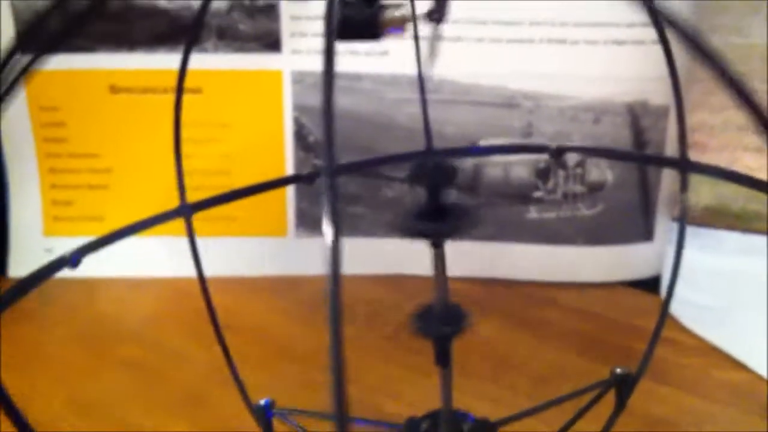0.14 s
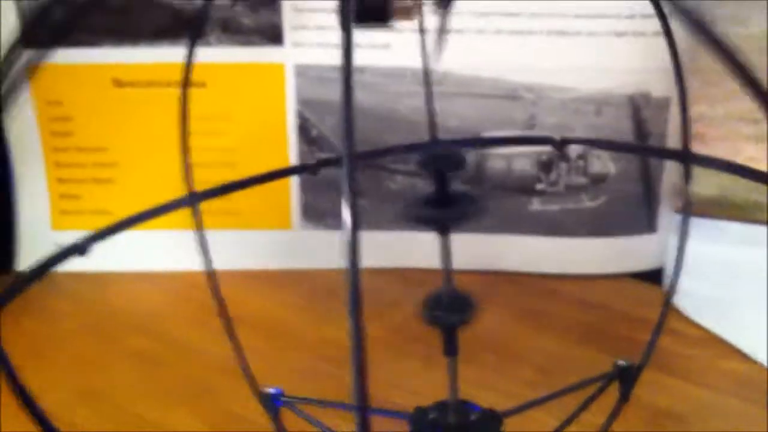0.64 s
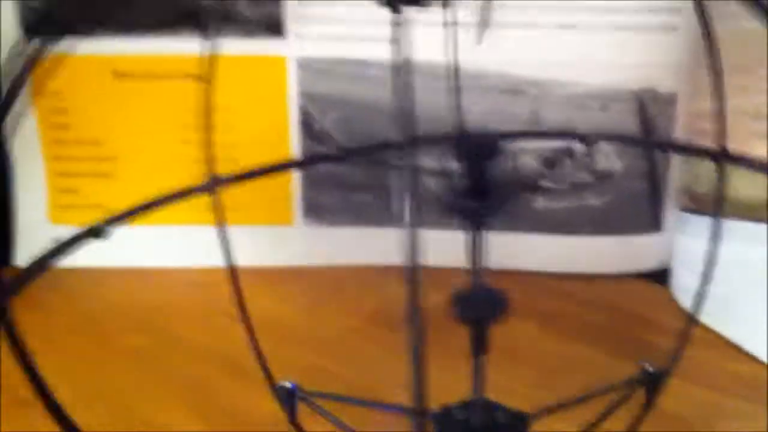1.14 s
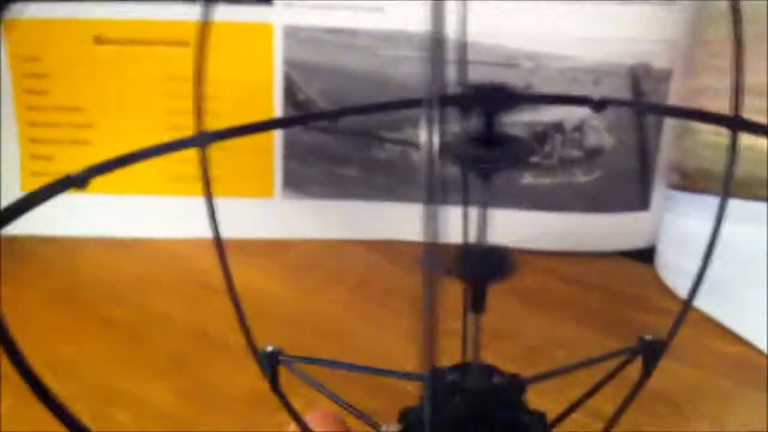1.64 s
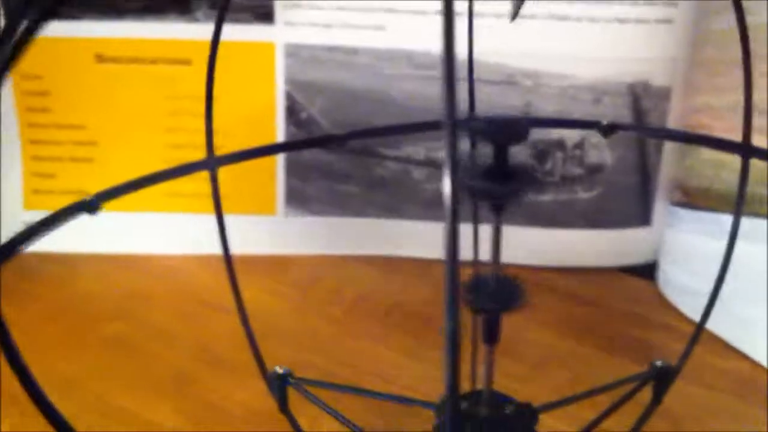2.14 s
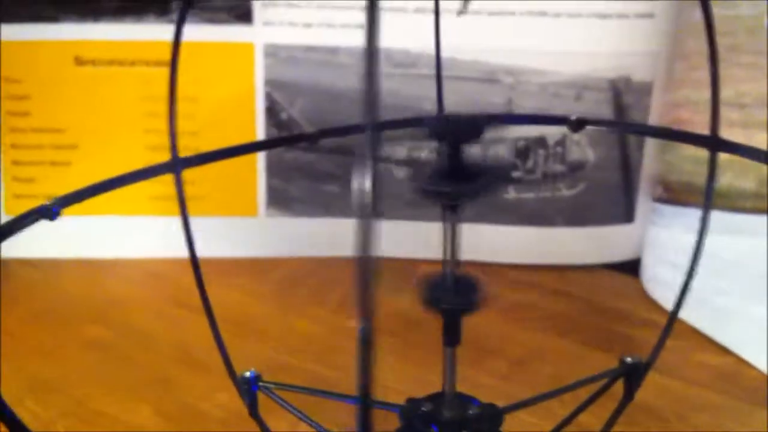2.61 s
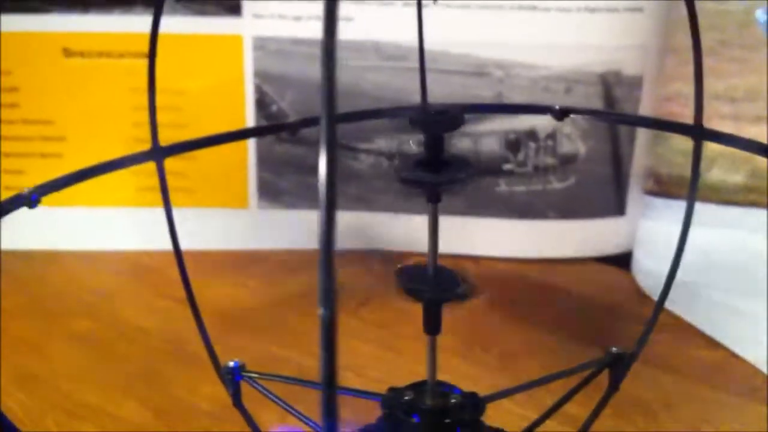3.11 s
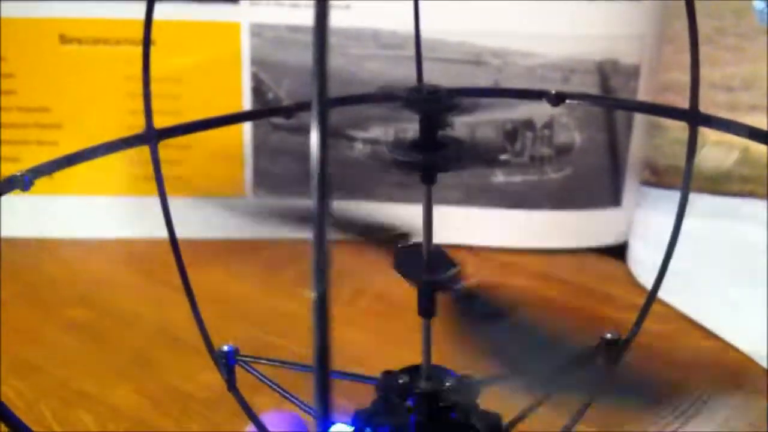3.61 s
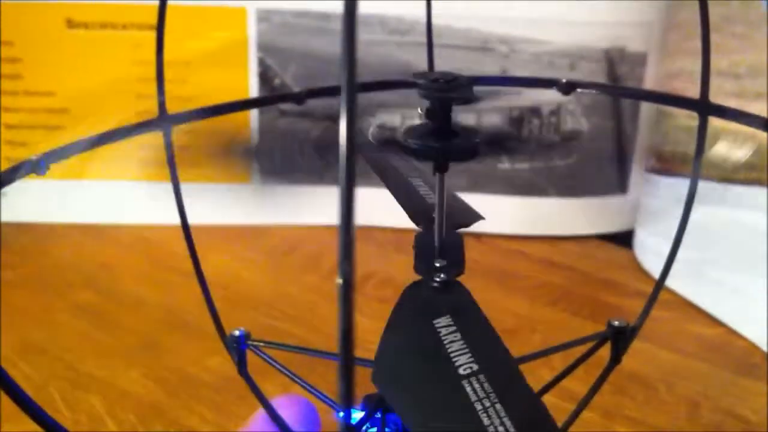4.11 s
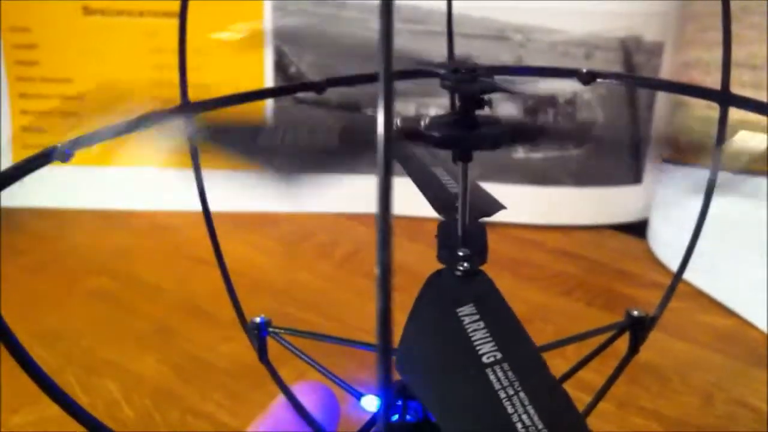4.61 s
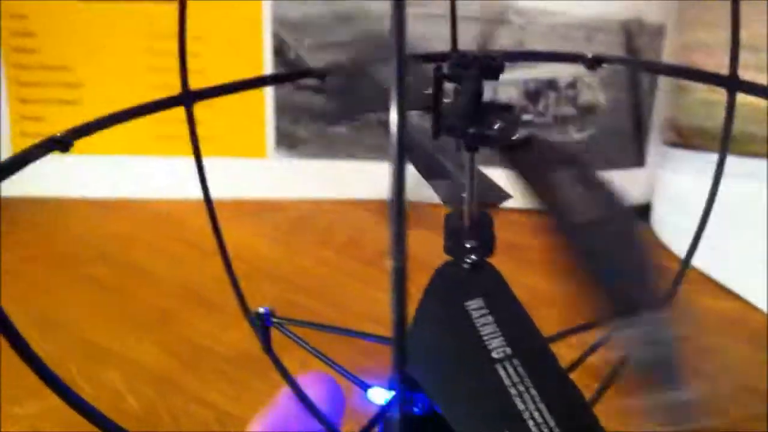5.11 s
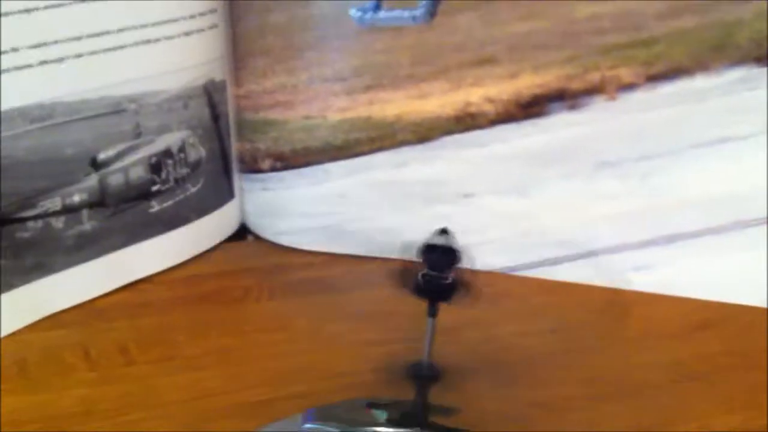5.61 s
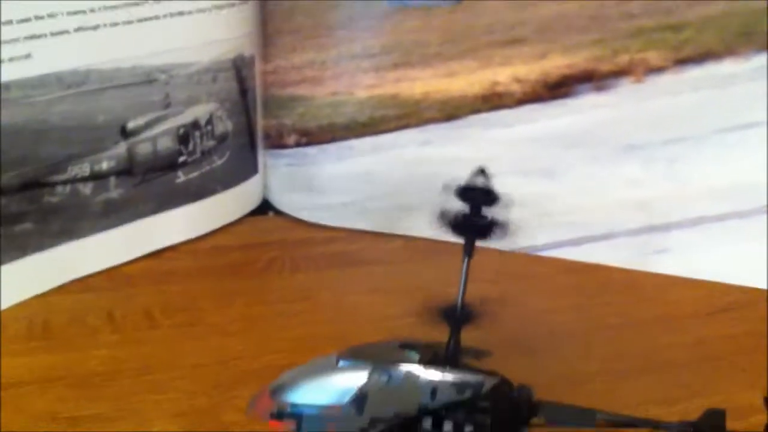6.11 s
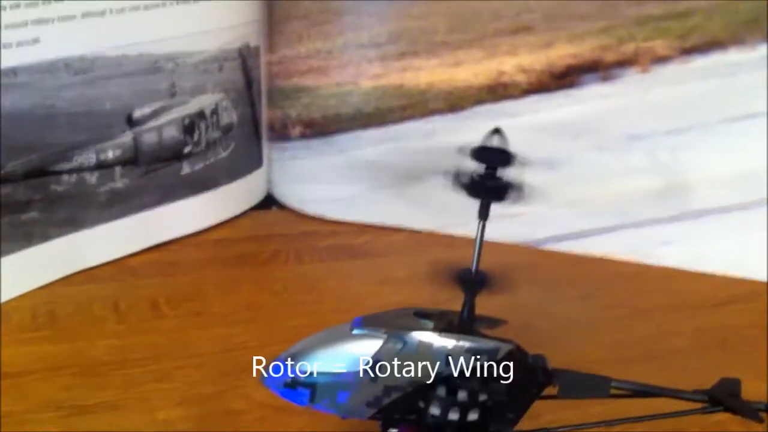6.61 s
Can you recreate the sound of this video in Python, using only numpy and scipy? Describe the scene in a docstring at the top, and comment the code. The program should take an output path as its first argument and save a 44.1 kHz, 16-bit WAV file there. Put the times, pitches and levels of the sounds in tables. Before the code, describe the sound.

A small toy helicopter whines harshly, drops in pitch, cuts off and coasts down with rattling gears; after clicks and a tiny gap, another whines up.

```python
"""A caged toy helicopter runs two geared motors on a table, is throttled back, switched off and coasts down
with rattling gears; a finger clicks and rubs. After a short silent gap a second, bare toy spins up.
Whines are sines at multiples of shaft speed; chopped motor current puts sidebands on every gear tone.
Gear and brush noise, knocks, air, boom and rub are noise shaped by resonant colours; blades are beating sines."""
import sys
import numpy as np
from scipy import signal
from scipy.fft import rfft, irfft
from scipy.io import wavfile
from scipy.ndimage import uniform_filter1d, map_coordinates

SR = 44100
rng = np.random.default_rng(int(sys.argv[2]) if len(sys.argv) > 2 else 0)


def ratio_of_db(decibels):
    """Turn decibels (scalar or array-like) into linear amplitude factors; 0 dB maps to 1."""
    return 10 ** (np.asarray(decibels, float) / 20)


def materialize(psi):
    """Save the field psi as 16-bit PCM at rate SR to the path in sys.argv[1].

    A 1-D psi becomes a single channel; in a 2-D psi each row is a channel.
    """
    bounded = np.clip(np.atleast_2d(psi).T, -1, 1)
    quanta = np.round(bounded * 32767).astype(np.int16)
    wavfile.write(sys.argv[1], SR, quanta)


N = 297675
T = np.arange(N) / SR
GAP_S = (5.232, 5.258)
OFF_S, OFF_FADE_S = 2.47, 0.036  # caged toy switched off
ON_S = 5.628  # bare toy switched on


def response_db(hz, colour, modes):
    """Smooth colour, linear in dB over log frequency, with resonant bumps."""
    f, db = np.transpose(colour)
    smooth = np.interp(np.log(np.maximum(hz, 1)), np.log(f), db)
    return smooth + sum(top / (1 + (2 * (hz - centre) / width) ** 2) for centre, width, top in modes)


def ring(x, colour, modes=()):
    """Causal filtering by the minimum-phase response of that colour; rms 1."""
    log_gain = response_db(np.fft.rfftfreq(8192, 1 / SR), colour, modes) * np.log(10) / 20
    cepstrum = irfft(log_gain)
    cepstrum[1:4096] *= 2
    cepstrum[4097:] = 0
    impulse = irfft(np.exp(rfft(cepstrum)))
    y = signal.fftconvolve(x, impulse)[:N]
    return y / np.sqrt(np.mean(y ** 2))


def highpass(x, hz, order):
    """Butterworth bass cut."""
    return signal.sosfilt(signal.butter(order, hz, "high", fs=SR, output="sos"), x)


def walk(rate_hz, n=N):
    """Random levels held 1 / rate_hz s and smoothed twice; spread near 1."""
    k = int(SR / rate_hz)
    held = np.repeat(rng.standard_normal(n // k + 1), k)
    return 1.3 * uniform_filter1d(uniform_filter1d(held, k), k)[:n]


def turns(hz):
    """Running phase in radians."""
    return 2 * np.pi * np.cumsum(hz) / SR


def step(at_s, over_s):
    """Smooth step from 0 to 1."""
    return .5 + .5 * np.tanh((T - at_s) / (2 * over_s))


def halvings(share):
    """log2 of a speed ratio: -1 per halving."""
    return np.log2(np.clip(share, .01, None))


# quiet hiss colour: (frequency [Hz], relative level [dB])
ROOM_COLOUR = [(18, -34.5), (30, -14), (49, -26), (221, -9.5), (473, -16.5), (540, -14), (616, -19.5),
               (822, -15), (1130, -11), (2350, -14), (16000, -21.5)]
ROOM_DB = -66
HUM_HZ, HUM_BEFORE_GAP_DB, HUM_AFTER_GAP_DB = 604, -77.5, -70


def room():
    """Quiet coloured hiss and a faint hum wavering in pitch and level."""
    hum_db = np.where(T < GAP_S[1], HUM_BEFORE_GAP_DB, HUM_AFTER_GAP_DB) + 2.8 * walk(25)
    hum = ratio_of_db(hum_db) * np.sin(turns(HUM_HZ + 7 * walk(25)))
    hiss_noise = ring(rng.standard_normal(N), ROOM_COLOUR)
    return ratio_of_db(ROOM_DB) * highpass(hiss_noise, 90., order=2) + hum


# low air noise colour: (frequency [Hz], relative level [dB])
RUMBLE_COLOUR = [(18, -40.5), (30, -16), (96, -14.5), (140, 2), (194, -4.5), (298, 5.5), (354, -4),
                 (778, -2.5), (1150, -9), (1800, -7), (2340, -48), (3960, -120)]
WASH_DB, WASH_FALL_DB_S, STILL_DB, BARE_WASH_DB = -45, -48, -69, -62  # downwash


def air():
    """Unsteady downwash noise that dies away around the switch-off and returns with the bare toy."""
    fall_s = np.maximum(T - OFF_S + 0.078, 0)
    level = ratio_of_db(WASH_DB + WASH_FALL_DB_S * fall_s) + ratio_of_db(STILL_DB)
    level = level + (T > ON_S) * ratio_of_db(BARE_WASH_DB)
    return ratio_of_db(0.69 * walk(25.1)) * level * ring(rng.standard_normal(N), RUMBLE_COLOUR)


# table top modes: (frequency [Hz], width [Hz], height [dB])
TABLE_MODES = [(200, 21, 8.8), (318, 50, 10.5)]
# booms: (from [s], to [s], level [dB])
BOOMS = [(2.5, 3.05, -64), (3.65, 4.43, -67.5), (5.028, 5.247, -70.5), (5.412, 6.75, -66),
         (5.85, 6.256, -60.5)]
BOOM_FLOOR_DB, BOOM_EDGE_S = -76.5, 0.046


def table_boom():
    """Low noise in the table's modes; each boom adds a smooth-edged stretch."""
    colour = [(60, -47), (160, -3.5), (250, -0.5), (400, -2.5), (800, -54)]
    table = ring(rng.standard_normal(N), colour, TABLE_MODES)
    level = ratio_of_db(BOOM_FLOOR_DB)
    for from_s, to_s, db in BOOMS:
        level = level + ratio_of_db(db) * (step(from_s, BOOM_EDGE_S) - step(to_s, BOOM_EDGE_S))
    return level * ratio_of_db(0.5 * walk(35)) * table


# clicks: (time [s], peak level [dB])
CLICKS = [(4.9621, -46), (4.9684, -24)]
# click ringing before bass cut and rounding: (frequency [Hz], relative level [dB], t60 [s])
CLICK_MODES = [(440, 10, 0.0066), (1220, 15.5, 0.0019), (2790, -22, 0.0013)]
RUB_S, RUB_RISE_S, RUB_DB = 5.04, 0.027, -62.5
SCUFF_S, SCUFF_LENGTH_S, SCUFF_DB = 5.4, .02, -67


def finger():
    """Two dull clicks of decaying sines; skin dragging on plastic and a faint scuff, both band noise."""
    t, out = T[:SR // 20], np.zeros(N)
    click = sum(ratio_of_db(db - 60 * t / t60) * np.sin(2 * np.pi * hz * t) for hz, db, t60 in CLICK_MODES)
    click = uniform_filter1d(highpass(click, 360.0, order=2), size=7)  # soft skin rounds the edge
    for s, db in CLICKS:
        start = int(s * SR)
        out[start:start + len(t)] += ratio_of_db(db) * click / np.max(click)
    scuff = ring(rng.standard_normal(N), [(300, -20), (800, 0), (2500, -3), (4000, -25)])
    scuff = ratio_of_db(SCUFF_DB) * np.exp(-((T - SCUFF_S) / SCUFF_LENGTH_S) ** 2) * scuff
    rub = ring(rng.standard_normal(N), [(700, -36), (1200, -6), (1450, 5), (1700, -10), (2500, -21)])
    rub = step(RUB_S, RUB_RISE_S) * (T < GAP_S[1]) * ratio_of_db(RUB_DB + 1.0 * walk(60)) * rub
    return out + rub + scuff


UPPER_LOAD_DB = 11


def whine(speed, tones, chop_hz, colour, modes, cruise_hz, wobble_hz, flutter_db):
    """Gear tones with chopper sidebands; each swells as it glides through the frame's modes."""
    on = speed[1] > -100
    hz, bite_db, load = (column[on] for column in speed)
    n = len(hz)
    hz = hz + wobble_hz * walk(40.02, n)
    shaft, chop, out = turns(hz), 2 * np.pi * chop_hz * T[on], np.zeros(N)
    for order, *levels in tones:
        load_db = UPPER_LOAD_DB * load * (order == 8)  # an exact eighth multiple swells under load
        for side, db in zip((0, -1, 1), levels):
            mode_db = response_db(order * hz[::64] + side * chop_hz, colour, modes)
            mode_db = mode_db - response_db(order * cruise_hz + side * chop_hz, colour, modes)
            mode_db = np.repeat(mode_db, 64)[:n]
            # sidebands flutter more than the tones they flank
            flutter = flutter_db * (1.8 if side else 1) * walk(34.96, n)
            gain = ratio_of_db(db + bite_db + load_db + mode_db + flutter)
            phase = order * shaft + side * chop + 2 * np.pi * rng.random()
            out[on] += np.sqrt(2) * gain * np.sin(phase)
    return out


def clatter(shaft, memory_turns):
    """Noise repeating every shaft turn, its pattern renewed over memory_turns."""
    turn = shaft / (2 * np.pi)
    pattern = rng.standard_normal((int(turn[-1] / memory_turns) + 2, 129))
    pattern[:, -1] = pattern[:, 0]
    return 1.5 * map_coordinates(pattern, [turn / memory_turns, turn % 1 * 128], order=1)


def hiss(speeds, depths, chop_hz, chop_depth, colour, modes, grit_db, clatter_db, memory_turns):
    """Tooth and brush noise, partly repeating with the shafts, puffing per turn and per chopper cycle."""
    gate = np.exp(chop_depth * np.cos(2 * np.pi * chop_hz * T))
    noise = rng.standard_normal(N)
    for speed, depth, db in zip(speeds, depths, clatter_db):
        shaft = turns(speed[0])
        gate = gate * np.exp(depth * np.cos(shaft))
        noise = noise + ratio_of_db(db) * clatter(shaft, memory_turns)
    grit = ratio_of_db(grit_db * walk(400) + 1.0 * walk(12))
    return ring(gate * grit * noise, colour, modes)


# teeth bite harder with speed and while speeding up; speed wavers under load
BITE_DB_PER_HALVING, LOAD_DB, FULL_LOAD_HZ_S, STRAIN_HZ = 11, 2.5, 1600, 3
FADE_FROM_S, FADE_DB_S = 6.44, -14  # gear tones thin out at the end


def bare_motor(table, cruise_hz):
    """Speed [turns/s], gear bite [dB] and load 0-1 of a motor spinning up."""
    hz = uniform_filter1d(np.interp(T, *np.transpose(table)), size=900)
    load = np.clip(np.gradient(hz) * SR / FULL_LOAD_HZ_S, 0, 1)
    db = BITE_DB_PER_HALVING * halvings(hz / cruise_hz) + LOAD_DB * load
    db = db + FADE_DB_S * np.maximum(T - FADE_FROM_S, 0)
    return hz + STRAIN_HZ * load * walk(70), np.where(T > ON_S, db, -200), load


# bare toy's motor speeds: (time [s], speed [turns/s])
BARE_A_SPEED = [(5.63, 110), (5.74, 215), (5.785, 282), (5.82, 350), (5.845, 378), (5.875, 400),
                (5.92, 416), (6.02, 425), (6.07, 421), (6.14, 405), (6.21, 397), (6.3, 393), (6.57, 389.5),
                (6.75, 382)]
BARE_B_SPEED = [(5.63, 69.93), (5.8, 180.3), (5.91, 248.2), (5.96, 282.9), (6.05, 318.4), (6.12, 322),
                (6.35, 327.2), (6.75, 318)]
# bare toy's gear tones at cruise, before the motor's gains:
# (multiple of shaft rate, level [dB], one chopper rate below [dB], one above [dB])
BARE_A_TONES = [(5, -51, -54, -60), (6, -58, -56, -54), (7, -36, -56, -48), (8, -47, -52, -51),
                (9, -57, -64, -66)]
BARE_B_TONES = [(5, -74.5, -70, -73), (6, -74, -86, -62), (7, -44, -67, -73), (9, -84, -70, -45.5),
                (10, -80, -58, -69)]
# frame and air path: (frequency [Hz], relative level [dB])
BARE_COLOUR = [(530, -45), (900, -21), (1460, -17), (1590, -13), (1770, -12.5), (1970, -6), (2540, -10),
               (2860, -2), (4800, -11), (5960, -11), (7680, -10), (8660, -8.5), (16000, -15)]
# frame modes: (frequency [Hz], width [Hz], height [dB])
BARE_MODES = [(1601, 49, 10.8), (1987, 56, 6), (2796, 100, 8.4), (3470, 170, 4.5), (6200, 800, 7.2),
              (8860, 500, 4.7), (9900, 500, 3.6)]
# thin tones of the speed controller: (frequency [Hz], mean rms level before inrush [dB])
CONTROLLER_TONES = [(13657, -61), (13997, -64), (14336, -64), (14686, -64), (15025, -64), (15364, -65)]
BARE_CHOP_HZ, BARE_NOISE_DB = 344.4, -33.5
ON_RISE_S, INRUSH_DB, INRUSH_S = .01, 3, 0.03
TURNS_PER_BLADE, THRUM_DB = 5.03, -71
BUZZ_DB, BUZZ_DB_S, BUZZ_FROM_S, BUZZ_RISE_S, BUZZ_EARLY_DB = -51.5, -3, 5.82, 0.018, -15


def bare():
    """Second toy: two whining motors, gear noise, chopper buzz, controller tones and blade thrum."""
    a, b = bare_motor(BARE_A_SPEED, cruise_hz=414.0), bare_motor(BARE_B_SPEED, cruise_hz=335)
    t = np.maximum(T - ON_S, 0)
    on = np.clip(t / ON_RISE_S, 0, 1) ** 2 * ratio_of_db(INRUSH_DB * np.exp(-t / INRUSH_S))
    body = BARE_CHOP_HZ, BARE_COLOUR, BARE_MODES
    tones = whine(a, BARE_A_TONES, *body, cruise_hz=393.0, wobble_hz=1.3, flutter_db=2.0)
    tones = tones + whine(b, BARE_B_TONES, *body, cruise_hz=320, wobble_hz=0.8, flutter_db=2.5)
    noise = hiss((a, b), (.2, .15), BARE_CHOP_HZ, 0.22, *body[1:],
                 grit_db=1.0, clatter_db=(-7, -7), memory_turns=6.)
    blade_hz, full = a[0] / TURNS_PER_BLADE, step(BUZZ_FROM_S, BUZZ_RISE_S)
    buzz_db = BUZZ_DB + BUZZ_DB_S * (T - BUZZ_FROM_S) + BUZZ_EARLY_DB * (1 - full) + 1.2 * walk(45)
    buzz_db = buzz_db + 6.3 * np.cos(turns(blade_hz / 2))  # once per rotor turn
    chop = 2 * np.pi * BARE_CHOP_HZ * T
    buzz = ratio_of_db(buzz_db) * (np.sin(chop) + ratio_of_db(-11.5) * np.sin(2 * chop))
    thin = sum(ratio_of_db(db + 2.5 * walk(20)) * np.sin(2 * np.pi * hz * T) for hz, db in CONTROLLER_TONES)
    thrum = full * ratio_of_db(THRUM_DB) * np.sin(turns(blade_hz))
    return on * (np.sqrt(2) * thin + tones + ratio_of_db(BARE_NOISE_DB) * noise + buzz + thrum)


# caged toy's two motors: (settled speed [turns/s], extra at first [turns/s], battery sag time [s],
# throttled back at [s], transition scale [s], speed lost [turns/s])
CAGED_MOTORS = [(362.3, 11.2, .6, 2.07, .075, 60), (385, 7.2, .6, 2.1, .11, 61)]
THROTTLED_DB = 1


def caged_motor(settled, extra, sag_s, back_s, over_s, lost):
    """Speed [turns/s], bite [dB], strain 0-1: battery sags, throttle comes back, current stops."""
    back = step(back_s, over_s)
    live = T < OFF_S + OFF_FADE_S
    hz = settled + extra * np.exp(-T / sag_s) - lost * back
    return hz, np.where(live, THROTTLED_DB * back, -200), 4 * back * (1 - back)


def throttled_back():
    """0 to 1 as the first motor is throttled back."""
    return step(*CAGED_MOTORS[0][3:5])


def coast(drag_s, friction_per_s):
    """Share of speed left after switch-off: drag alone halves it in drag_s, friction falls linearly."""
    t = np.maximum(T - OFF_S, 0)
    return np.clip(1 / (1 + t / drag_s) - friction_per_s * t, .01, 1)


# blade tones: (multiple of rotor speed, upper rotor relative level [dB], lower rotor relative level [dB])
BLADE_TONES = [(2, -11.5, -10.5), (4, -.8, -.2), (3, -22, -22.5), (6, -6, -18.5), (8, -13, -20.5),
               (10, -10, -18.5), (12, -7, -22.5), (16, -2, -27)]
TURNS_PER_ROTOR_TURN = 9.72
ROTOR_SLIP_HZ, ROTOR_CROSS_S = 1.05, 0.807  # lower rotor's extra speed; a moment when blades stand crossed
BLADES_DRAG_S, BLADES_FRICTION_PER_S = .8, 0.12
BLADE_LOW_DB, LOW_DB_PER_HALVING = -46.5, 36.5  # multiples up to 4
BLADE_HIGH_DB, HIGH_DB_PER_HALVING = -49.5, 38  # multiples above 4, and...
BLADE_MID_BACK_DB = 9  # ...8 to 10 stand out while throttled back


def blades():
    """Two rotors at nearly the same speed: their tones beat."""
    motor, left = caged_motor(*CAGED_MOTORS[0])[0], coast(BLADES_DRAG_S, BLADES_FRICTION_PER_S)
    low_db = BLADE_LOW_DB + LOW_DB_PER_HALVING * halvings(motor * left / motor[0])
    high_db = BLADE_HIGH_DB + HIGH_DB_PER_HALVING * halvings(left)
    back_db = BLADE_MID_BACK_DB * (throttled_back() - step(OFF_S, .02))
    upper = turns(motor * left / TURNS_PER_ROTOR_TURN)
    lower = upper + 2 * np.pi * ROTOR_SLIP_HZ * (T - ROTOR_CROSS_S) + np.pi / 2
    out = 0
    for k, upper_db, lower_db in BLADE_TONES:
        level = ratio_of_db(low_db) if k <= 4 else ratio_of_db(high_db + (8 <= k <= 10) * back_db + 2.5 * walk(15))
        out = out + level * (ratio_of_db(upper_db) * np.sin(k * upper) + ratio_of_db(lower_db) * np.sin(k * lower))
    return out


# bouts of harder knocking: (start [s], fade time [s], added level [dB], added knocks over drag [dB])
BOUTS = [(2.64, 0.33, 3.5, 6), (3.45, 0.19, -0.5, 5), (4.22, 0.11, 2.5, 5), (4.62, 0.11, 1.5, 7.5)]
# knock colour against the drag: (frequency [Hz], relative level [dB])
KNOCK_TILT = [(1000, -8), (2000, -3), (3000, -2), (3800, 1), (5500, -2), (7700, 3), (10000, -2), (13000, 0),
              (16000, -3)]
# frame and air path while coasting: (frequency [Hz], relative level [dB])
COAST_COLOUR = [(590, -52), (1000, -26), (1710, -20.5), (2050, -2.5), (2310, -11), (2590, -8.5),
                (3120, -10.5), (3710, -1.5), (4790, -10.5), (5500, -6), (6550, -7.5), (7620, -6.5),
                (10800, -16.5), (13300, -15), (16000, -23)]
# caged frame's modes, running and coasting: (frequency [Hz], width [Hz], height [dB])
CAGED_MODES = [(2020, 160, 4.9), (2570, 190, 5.5), (2960, 79, 4), (3390, 310, 3), (3740, 380, 3.4),
               (5700, 630, 1), (7490, 180, 4.6), (7960, 170, 1.67), (8290, 200, 2.1), (9840, 1300, 2.3)]
GEARS_DRAG_S, GEARS_FRICTION_PER_S, KNOCKS_PER_TURN = 1.1, .085, .56
SLACK_DB, SLACK_FROM_S, SLACK_DB_S = -36, 1.88, 10
COAST_DB, COAST_DB_PER_HALVING = -36.5, 10.5
KNOCK_DB, KNOCKS_END_S = -4.5, 4.8  # knocks over drag outside the bouts


def coasting():
    """Slack gears knock ever slower, each knock a scrape that lengthens as they slow, over a drag noise."""
    left = coast(GEARS_DRAG_S, GEARS_FRICTION_PER_S)
    knock_hz = KNOCKS_PER_TURN * caged_motor(*CAGED_MOTORS[0])[0] * left
    louder_db, knock_db = 0, KNOCK_DB
    for s, fade_s, db, over_db in BOUTS:
        bout = step(s, 0.0056) * np.exp(-np.maximum(T - s, 0) / fade_s)
        louder_db, knock_db = louder_db + db * bout, knock_db + over_db * bout
    off = step(OFF_S + OFF_FADE_S / 2, 0.005)
    slack_db = SLACK_DB + SLACK_DB_S * (T - SLACK_FROM_S)
    coast_db = COAST_DB + COAST_DB_PER_HALVING * halvings(left)
    db = (1 - off) * slack_db + off * coast_db + louder_db
    phase = np.cumsum(knock_hz * np.clip(1 + .18 * walk(60), .2, 3)) / SR
    index = phase.astype(int)
    size_db = 2.5 * np.clip(rng.standard_normal(index[-1] + 1), -2, 1.3)[index]
    size = ratio_of_db(size_db + 1.5 * walk(9))
    scrape = uniform_filter1d(size * np.exp(-(phase % 1) / .26), 60)
    knocks = ring(scrape * rng.standard_normal(N), KNOCK_TILT)
    drag = ratio_of_db(1.5 * walk(35) + 1.3 * walk(150)) * rng.standard_normal(N)
    share = 1 / (1 + ratio_of_db(-2 * knock_db)) * (1 - step(KNOCKS_END_S, .04))  # knocks' share of power
    drive = np.sqrt(share) * knocks + np.sqrt(1 - share) * drag
    present = step(SLACK_FROM_S, .03) * (T < GAP_S[1])
    return ratio_of_db(db) * present * ring(drive, COAST_COLOUR, CAGED_MODES)


# caged toy's gear tones at cruise, before the motor's gains:
# (multiple of shaft rate, level [dB], one chopper rate below [dB], one above [dB])
CAGED_A_TONES = [(5.055, -53.5, -72, -47), (6.02, -49, -59.5, -44.5), (6.997, -31, -49.5, -40.5),
                 (8.006, -34.5, -55, -50), (8.94, -54, -50.5, -55), (10.024, -37.5, -46, -39.5),
                 (11.17, -51, -55, -58), (11.85, -49, -59, -52), (13.92, -43.5, -54, -48),
                 (15.02, -44, -45.5, -43.5), (19.85, -58, -60.5, -47), (21.48, -54, -46, -45),
                 (21.33, -54, -42, -53)]
CAGED_B_TONES = [(9.06, -45, -45, -50), (19.96, -57.5, -45, -47), (20.67, -46, -37, -39.5),
                 (21.8, -59.5, -38, -52)]
# frame and air path: (frequency [Hz], relative level [dB])
CAGED_COLOUR = [(590, -38.5), (1000, -19.5), (1540, -38.5), (2010, -7.5), (2310, -11.5), (2530, -6),
                (3800, -2.5), (4730, -11), (5190, -4), (6470, -8), (7700, -1), (13400, -13.5), (16000, -22)]
CAGED_CHOP_HZ, OFF_DB = 242.6, -6.5
CAGED_NOISE_DB = -26  # gear and brush noise, before the shared gain below
CAGED_SWELL_DB, CAGED_EASE_DB = 1.5, -2.5  # slow swell up to switch-off; drop when throttled
CAGED_STRAIN_HZ, CAGED_STRAIN_DB = 2.5, -4


def caged():
    """Both motors' whine and gear noise; they die with the current."""
    speeds = []
    for row in CAGED_MOTORS:
        hz, bite_db, strain = caged_motor(*row)
        # speed wavers and tones thin while the throttle comes back
        hz = hz + CAGED_STRAIN_HZ * strain * walk(60)
        speeds.append((hz, bite_db + CAGED_STRAIN_DB * strain, 0 * T))
    a, b = speeds
    dying = np.clip((T - OFF_S) / OFF_FADE_S, 0, 1)
    db = CAGED_SWELL_DB * T / OFF_S + CAGED_EASE_DB * throttled_back()
    db = db + np.where(dying < 1, OFF_DB * dying, -200)
    body = CAGED_CHOP_HZ, CAGED_COLOUR, CAGED_MODES
    tones = whine(a, CAGED_A_TONES, *body, cruise_hz=368.0, wobble_hz=0.398, flutter_db=0.74)
    tones = tones + whine(b, CAGED_B_TONES, *body, cruise_hz=396.0, wobble_hz=0.612, flutter_db=-1)
    noise = hiss((a, b), (.15, .3), CAGED_CHOP_HZ, 0.14, *body[1:],
                 grit_db=0.5, clatter_db=(-11, -8), memory_turns=5.)
    return ratio_of_db(db) * (tones + ratio_of_db(CAGED_NOISE_DB) * noise)


def scene():
    """Everything reaches one microphone, heard on both channels."""
    background = room() + air() + table_boom() + finger()
    mono = background + bare() + blades() + coasting() + caged()
    return np.array([mono, mono])


def top_cut(x):
    """Nothing passes above the cut-off."""
    return signal.sosfilt(signal.butter(12, 15760, fs=SR, output="sos"), x)


def record(dry):
    """A short silent gap with 2.4 ms fades; steep treble cut at 15.75 kHz."""
    gap = np.clip(np.maximum(GAP_S[0] - T, T - GAP_S[1]) / 0.0024, 0, 1)
    treble_cut = signal.ellip(10, .2, 80, 15750, fs=SR, output="sos")
    mix = signal.sosfilt(treble_cut, dry * gap)
    return top_cut(mix)


dry = scene()
out = record(dry)
materialize(out)
```